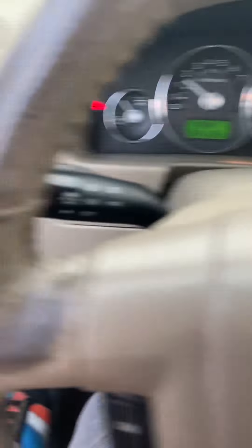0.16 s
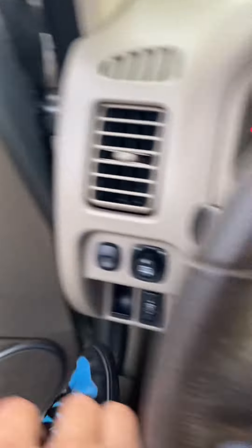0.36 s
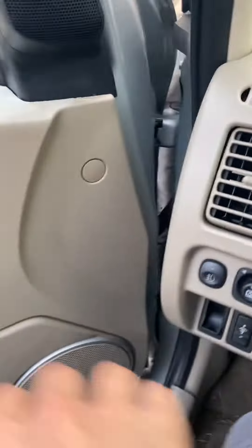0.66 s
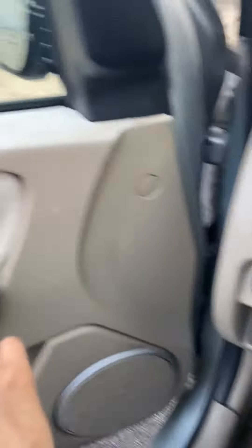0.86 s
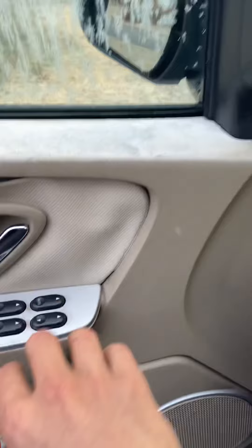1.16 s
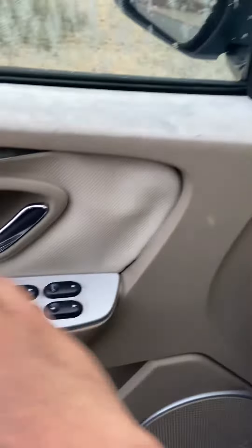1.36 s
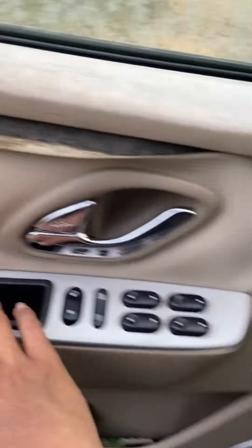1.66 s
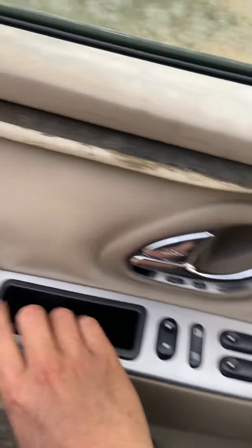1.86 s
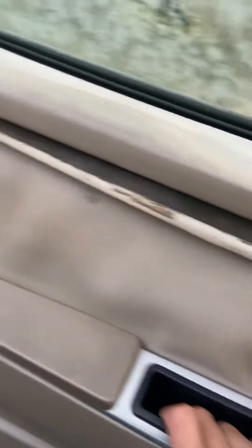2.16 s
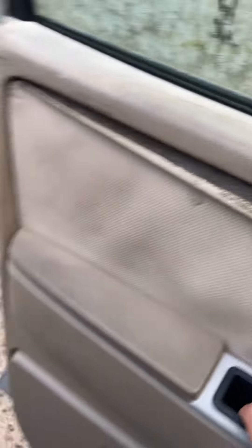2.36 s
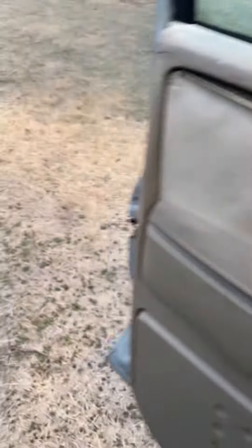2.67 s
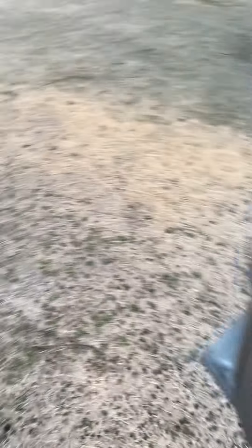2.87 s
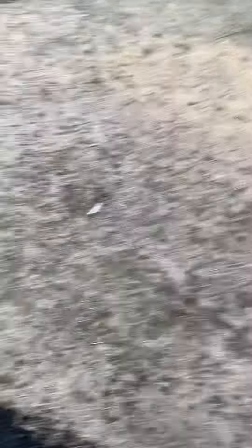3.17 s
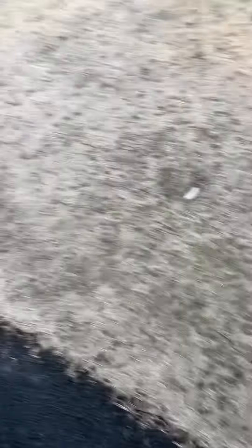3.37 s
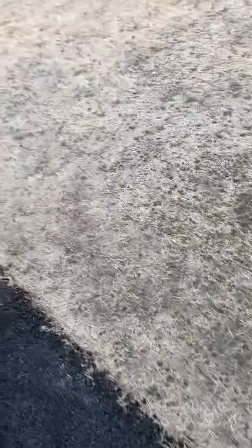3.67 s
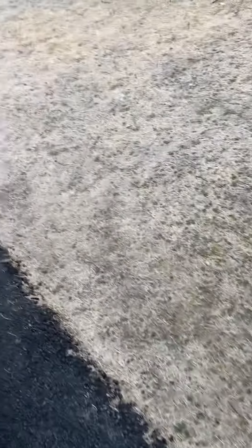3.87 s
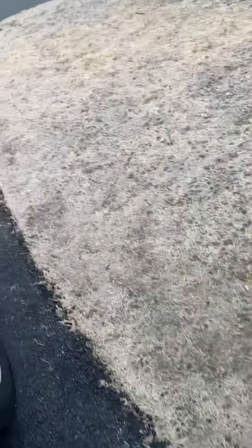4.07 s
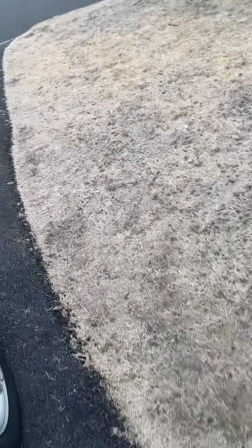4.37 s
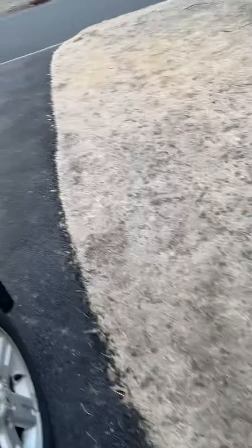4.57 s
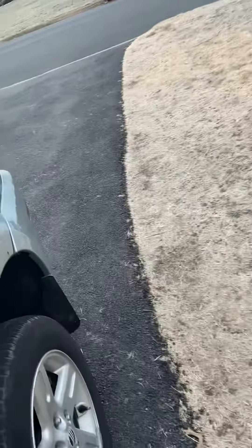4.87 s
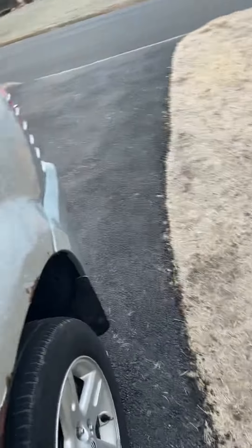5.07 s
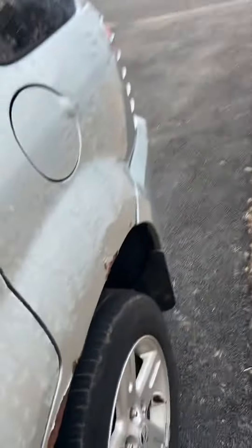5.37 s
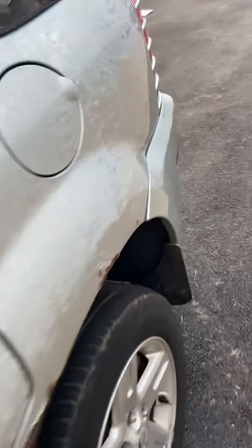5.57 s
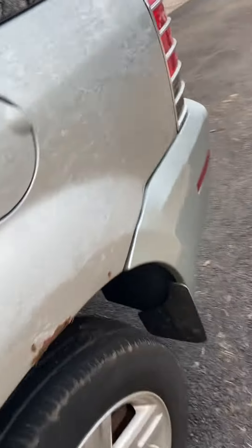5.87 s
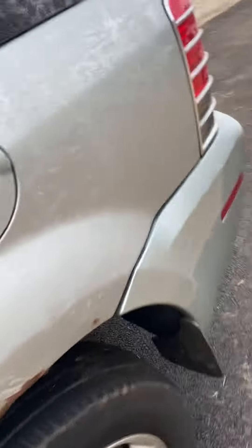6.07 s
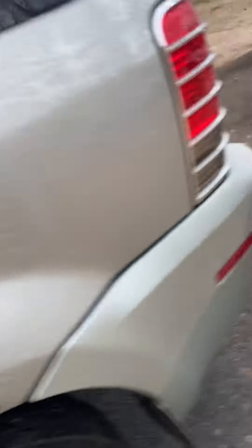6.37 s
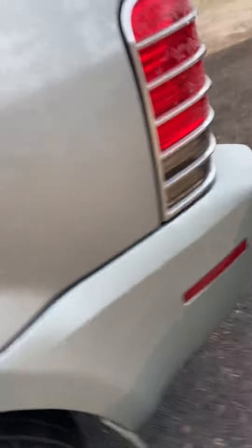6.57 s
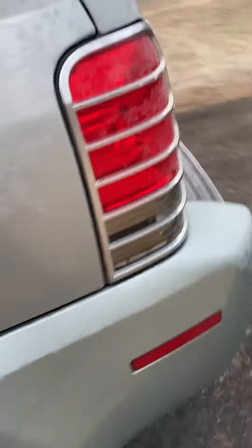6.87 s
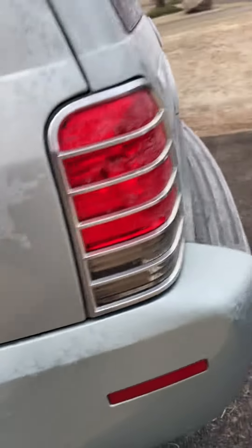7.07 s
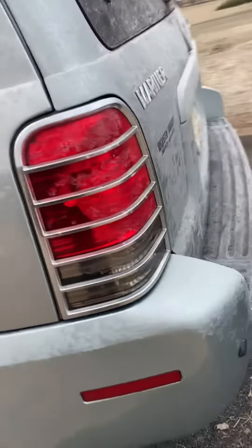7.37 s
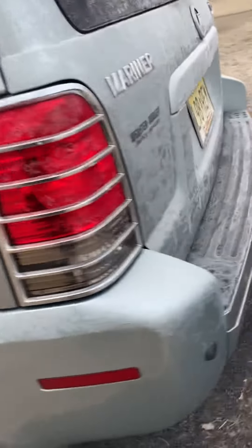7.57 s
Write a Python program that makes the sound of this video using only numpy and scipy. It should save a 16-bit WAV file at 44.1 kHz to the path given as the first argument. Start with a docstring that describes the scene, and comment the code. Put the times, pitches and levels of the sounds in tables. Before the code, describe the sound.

Low droning car idle with whine and hiss, knocks on plastic trim and rustling cloth, then one heavy door slam as the engine runs on.

```python
"""A cold four-cylinder car engine runs at fast idle on a driveway, heard from a hand-held microphone.
Exhaust tones, a pulley hum, an alternator whine and coloured noises share one slightly wandering crank.
Someone climbs out of the driver's seat, bumping and tapping the trim, steps onto dry grass and walks to the rear:
impulses strike ringing modes and bursts of noise, and cloth rubs. The door swings shut: the latch rattles
home through small metal modes, then the panel and cabin boom through large ones."""
import sys
import numpy as np
from scipy import signal
from scipy.fft import rfft, irfft, next_fast_len
from scipy.io import wavfile
from scipy.ndimage import map_coordinates

SR = 44100
rng = np.random.default_rng(int(sys.argv[2]) if len(sys.argv) > 2 else 0)


def inscribe(sig):
    """Save sig as 16-bit PCM at rate SR to the path in sys.argv[1].

    A 1-D sig is mono; a 2-D sig holds one channel per row.
    Samples are clipped to [-1, 1] before scaling.
    """
    pcm = np.round(np.clip(np.atleast_2d(sig).T, -1, 1) * 32767)
    wavfile.write(sys.argv[1], SR, pcm.astype(np.int16))


N = 340011
TIME = np.arange(N) / SR

# Pitches: mean firing rate, pulley, drone beside the car, alternator
FIRING_HZ, PULLEY_HZ, DRONE_HZ, WHINE_HZ = 53.35, 111.0, 341.0, 1146.2
# The four cylinders differ in strength and timing, and no two cold strokes burn alike
UNEVEN_DB, LOPE_RAD, STROKE_SCATTER_DB = 0.5, 0.065, 0.5
# Levels before any swell or exposure change
DRONE_DB, OFFBEAT_DB, WHINE_DB = -57.5, -54.5, -56.5
RUMBLE_DB, SILENCER_DB, FAN_DB, CLATTER_DB, TAILPIPE_DB = -43.5, -44, -49.5, -50, -53.5
# Share of the exposure's swing in dB that each bay sound follows
FAN_FOLLOWS, CLATTER_FOLLOWS, WHINE_FOLLOWS = 0.42, 1.1, 0.5
FAN_FADE_DB_PER_S = 1  # the fan falls behind on the walk
# The rear corner is rounded: time, ease of the turn, and how the bay's noises change there
CORNER_S, CORNER_TURN_S, REAR_FAN_DB, REAR_CLATTER_DB = 6.3, 0.42, 6.5, -3.5
TAILPIPE_OPEN_S, TAILPIPE_TURN_S = 6.28, 0.12  # the bumper stops shading the rush
RUB_ATTACK_S, RUB_RELEASE_DB_PER_S = 0.012, 149
HARD_CONTACT_HZ = 900  # contacts softer than this stir the small modes less

# Exhaust tones: (multiple of the firing rate, level [dB])
EXHAUST_TONES = [(1, -44), (2, -47), (3, -40), (4, -41.5), (5, -42), (6, -68), (7, -61.5), (8, -63.5),
                 (9, -63.5), (11, -74.5)]
# Walk spots where reflections swell or cancel an exhaust tone:
# (multiple, time [s], change [dB], half-width [s])
EXHAUST_SPOTS = [(1, 3.8, 11, 1.95), (1, 7.27, -13, 0.36), (2, 2.2, -9, 0.28), (2, 8.3, -19, 1.4),
                 (3, 0.66, -8, 0.82), (3, 3.1, 1, 0.25), (3, 5.05, -24, 0.43), (4, 0.1, -20, 0.23),
                 (4, 1.97, 7.5, 0.61), (4, 6.04, 4, 0.32), (4, 7.3, 1, 0.36), (5, 2.67, -12, 1.18),
                 (5, 6.42, -8.5, 0.14), (5, 7.63, 1.5, 0.41), (6, 7, 10, .4), (7, 4.1, 7, 0.78),
                 (8, 7.8, 4, 0.4), (9, 7.9, 1, 0.28)]
# Swells of the tone between exhaust multiples: (time [s], change [dB], half-width [s])
OFFBEAT_SWELLS = [(2.1, 8, 0.51), (6.8, 9.5, 0.45)]
# Belt-driven pulley hum, each tone loudest at one spot of the walk:
# (multiple of the pulley rate, level [dB], time of the spot [s], swell there [dB])
PULLEY_TONES = [(4, -65, 7.3, 8), (5, -65, 7, 2), (6, -63.5, 4.2, 6.5), (7, -64, 3.85, 9), (8, -68, 1.3, 9),
                (11, -71, 1.7, 6), (20, -67, 4.4, 4)]
# Alternator whine: (multiple of the whine pitch, level within the whine [dB])
WHINE_TONES = [(1, -4), (2, -1), (3, -11), (4, -13.5)]
# Swells and dips of the whine's partials: (multiple, time [s], change [dB], half-width [s])
WHINE_SWELLS = [(1, 2.3, 4, .2), (1, 2.7, -12, .12), (1, 3.7, -6, .2), (1, 5.05, -12, .25),
                (1, 6.75, -9, .13), (1, 7.6, 6, .25), (2, 0.2, -8, .35), (2, 1.35, 4.5, .12),
                (2, 1.9, -5, .12), (2, 2.35, 3, .15), (2, 2.85, -4, .15), (2, 3.58, 5.5, .2),
                (2, 4.1, -4, .06), (2, 4.3, 2, .1), (2, 4.9, -8, .3), (2, 7.35, 4, .22), (3, 4.7, -5, .7),
                (3, 6.5, 2.5, .2), (3, 7.25, 4.5, .22), (4, 7.1, 6, .2)]
# Low exhaust rumble, colour: (frequency [Hz], relative density [dB])
RUMBLE_COLOUR = [(20, -29), (32, -22), (45, -10), (65, 1.5), (105, 1.5), (135, -3.5), (175, -8),
                 (300, -36.5), (1000, -74.5)]
# Silencer gas noise, colour: (frequency [Hz], relative density [dB])
SILENCER_COLOUR = [(120, -10.5), (178, -5), (235, 2.5), (280, -2), (320, -7.5), (450, -25.5), (900, -81)]
# Fan noise, colour: (frequency [Hz], relative density [dB])
FAN_COLOUR = [(180, -60.5), (360, 3), (470, -2.5), (620, 2), (760, -5), (1000, -5.5), (1170, -6.5),
              (1500, -6.5), (2000, -43), (4000, -81)]
# Valve clatter, colour: (frequency [Hz], relative density [dB])
CLATTER_COLOUR = [(1000, -42), (1680, -10.5), (1900, -1), (2250, -2.5), (2450, -7), (2800, -11),
                  (4000, -103)]
# Treble hiss of the belt, colour: (frequency [Hz], relative density [dB])
HISS_COLOUR = [(1500, -14), (2700, 2), (3400, 2), (4000, -2), (5200, 0.5), (5800, -0.5), (6400, -6.5),
               (8200, -10), (10500, -13.5), (14000, -17), (15200, -27.5), (18000, -45)]
# Tailpipe rush, colour: (frequency [Hz], relative density [dB])
TAILPIPE_COLOUR = [(300, -41), (520, 10.5), (720, 3), (950, -34), (1700, -13), (2550, 1), (2900, -6.5),
                   (3250, 0.5), (3650, -9), (4000, -11), (6000, -34), (12000, -34)]
# Rubbing cloth, colour: (frequency [Hz], relative density [dB])
CLOTH_COLOUR = [(150, -29), (450, 7), (1100, -11.5), (1800, -2), (3000, -29), (5500, -11.5), (10500, -12.5),
                (15500, -21), (18000, -30)]
# How diffuse the steady noises are: (frequency [Hz], side minus mid [dB])
NOISE_WIDTH = [(100, -79), (250, -23), (500, -6.5), (1100, -5), (1900, -18), (3000, -6.5), (4500, -6.5),
               (7000, -85), (14000, -44.5)]
# How openly the engine bay is heard, past the open door and along the car;
# only the swing about the mean counts: (time [s], level [dB])
BAY_EXPOSURE = [(0.95, -53.5), (2.34, -50.5), (2.53, -50.5), (3.7, -51.5), (4.64, -51), (5.58, -51.5),
                (5.98, -47.5), (6.45, -50), (6.97, -50.5), (7.71, -49)]
# Hiss along the walk: (time [s], level [dB])
HISS_WALK = [(0, -56.5), (0.3, -54), (1.1, -54.5), (2.3, -53), (3.25, -51.5), (3.9, -52.5), (5.4, -54),
             (6.35, -52), (6.8, -51.5), (7.15, -49.5), (7.7, -51.5)]
# The door meets its seal, beds in and rocks on its latch:
# (time [s], impulse level [dB], contact softness as low-pass [Hz])
SLAM_CONTACTS = [(5.6496, -16.5, 750), (5.6556, -6, 600), (5.6586, -11.5, 930), (5.68, -9, 247),
                 (5.7078, -7, 104), (5.713, -9.5, 69.5), (5.716, -26, 550)]
# Door panel and cabin resonances: (frequency [Hz], level [dB], t60 [s])
PANEL_MODES = [(52.5, 2.3, 0.11), (61.7, -4.5, 0.38), (80.3, -8.5, 0.47), (108, 7, 0.06),
               (131, -18.5, 0.33), (205, -31, 0.54), (247, -1, 0.073), (271, -3, 0.14), (311, 2.1, 0.047),
               (440, -21, 0.17), (506, 2.5, 0.063), (560, -24, 0.17), (628, -21, 0.18), (715, -20, 0.21),
               (1016, -26, 0.12), (1110, -24, 0.18), (1400, -22, 0.095), (1440, -20, 0.093)]
# Latch pawl and lock rods: (time [s], impulse level [dB], impulse level of the bright metal ping [dB])
LATCH_CLICKS = [(5.6256, -12, -17), (5.6285, -10.5, -13), (5.6325, -18, -18), (5.637, -22, -30),
                (5.6445, -15, -8), (5.6487, -12.5, -11), (5.656, -20, -22), (5.664, -22, -26),
                (5.6755, -24, -8), (5.686, -24.5, -19), (5.706, -35, -25)]
# Latch resonances: (frequency [Hz], level [dB], t60 [s])
METAL_MODES = [(503, -10.5, 0.11), (743, -13, 0.056), (1050, -16.5, 0.029), (1470, -12.5, 0.041),
               (1560, -11.5, 0.056), (1900, -21, 0.045), (2300, -21, .04), (3420, -26, 0.036),
               (4650, -29, 0.03), (5230, -26, 0.033), (5500, -32, .035)]
# Feet and knees bump the sill and trim:
# (time [s], impulse level [dB], contact softness as low-pass [Hz])
BODY_BUMPS = [(0.2462, -18, 1300), (0.251, -31, 400), (0.435, -24, 3000), (0.442, -8.5, 251),
              (0.4613, -12, 292), (0.4782, -19, 788), (0.5053, -18, 747), (0.542, -20.5, 700),
              (0.576, -18.5, 800), (0.593, -10.5, 362), (0.603, -16.5, 700), (0.6287, -13.5, 114),
              (0.648, -20, 106), (0.67, -12, 70), (1.724, -24, 250)]
# Floor pan resonances: (frequency [Hz], level [dB], t60 [s])
FLOOR_PAN_MODES = [(53.6, -28, 0.45), (93, -18, 0.62), (98, -8.5, 0.036), (170.3, -4, 0.11),
                   (197, -33, 0.55), (220, -9.5, 0.04), (289.4, -17, 0.23), (344, -23.5, 0.22),
                   (508, -17, 0.09), (613, -22, 0.072), (1020, -17, 0.026), (1230, -26, 0.057)]
# Taps on plastic trim and crackles underfoot: (time [s], ring level [dB], ring centre [Hz], ring t60 [s],
# upper mode level [dB], upper mode [Hz], crack impulse level [dB])
TRIM_TAPS = [(0.171, -38, 7100, .01, -62, 10500, -42), (0.4355, -28, 1100, 0.037, -43, 2600, -29.5),
             (0.442, -35, 2480, 0.013, -48, 2900, -48), (0.472, -35, 1020, 0.03, -44, 2500, -43),
             (0.487, -36, 1190, 0.018, -35, 1900, -43), (0.5181, -34, 1200, .025, -43, 2300, -50),
             (0.547, -31, 754, .025, -45, 1300, -49), (0.556, -32, 1020, .025, -37, 2650, -52),
             (0.572, -34, 1250, .016, -37, 2000, -52), (0.5877, -29, 1000, 0.022, -38, 1600, -49),
             (0.599, -38, 1230, 0.026, -32, 2050, -51), (0.6443, -37, 800, 0.029, -47, 1900, -53),
             (1.7192, -21, 1030, 0.021, -30.5, 3560, -39), (1.738, -37, 1100, 0.05, -50, 1300, -60),
             (2.0295, -21, 856, 0.014, -34, 1600, -27.5), (2.172, -25, 667, 0.022, -30, 1440, -57),
             (2.180, -33, 560, 0.05, -40, 1350, -59), (2.5465, -30, 1040, 0.015, -35, 2400, -32),
             (3.402, -35, 2860, 0.012, -38, 4000, -49), (3.436, -25, 3630, 0.0046, -40, 5240, -40),
             (3.44, -40, 8700, .008, -36, 4000, -55)]
# Shoes scrape over the sill: (start [s], length [s], level [dB], centre [Hz])
SHOE_SCRAPES = [(0.39, 0.032, -51, 8000), (0.525, 0.045, -54, 2400), (0.52, 0.052, -49, 4500),
                (0.5, 0.095, -44, 1300), (0.53, 0.08, -35, 350)]
# Clothes slide over the seat and along the door: (start [s], length [s], level [dB])
CLOTH_RUBS = [(0.03, 0.27, -56.5), (0.429, 0.16, -44.5), (1.822, 0.79, -57)]
# Stereo phase by frequency: (frequency [Hz], left leads by [rad])
STEREO_PHASE = [(50, .02), (200, -.08), (700, -.4), (1200, -.4), (2700, .5), (4400, .55), (5200, .15),
                (6800, 3), (8100, 3.25), (9700, 6.2), (11500, 6.6), (12700, 9.3), (14500, 9.5),
                (15500, 12.4)]
# Stereo balance by frequency: (frequency [Hz], left minus right [dB])
STEREO_BALANCE = [(50, .1), (125, .2), (200, .7), (330, 2), (700, -.3), (1300, 0), (2400, -1), (8000, 0)]


def from_db(db):
    """Decibels to gain."""
    return np.exp(np.asarray(db) * (np.log(10) / 20))


def rms_one(x):
    """Scale to rms 1."""
    return x / np.sqrt(np.mean(x ** 2) + 1e-20)


def at_hz(points, hz):
    """Read a table on a log-frequency axis."""
    f, value = np.transpose(points)
    return np.interp(np.log(hz + 1), np.log(f), value)


def at_time(points):
    """Draw a table as straight lines over the whole scene."""
    return np.interp(TIME, *np.transpose(points))


def drift(rate):
    """Slow chance with spread 1: smoothed noise, computed every 100 samples; rate in Hz."""
    r = np.exp(-200 * np.pi * rate / SR)
    raw = rng.standard_normal(N // 100 + 2002)
    slow = signal.lfilter([1], [1, -2 * r, r * r], raw)[2000:]
    return np.interp(np.arange(N) / 100, np.arange(len(slow)), rms_one(slow))


def band(x, hz, kind, order=2):
    """Causal low-, high- or band-pass."""
    sos = signal.butter(order, np.clip(hz, 10, .45 * SR), kind, fs=SR, output="sos")
    return signal.sosfilt(sos, x + 1e-18)


def swell(s, db, width_s):
    """A smooth rise or dip in dB as the microphone passes a spot."""
    return db * np.exp(-.5 * ((TIME - s) / width_s) ** 2)


def swells_of(multiple, spots):
    """Sum the swells in dB that belong to one partial."""
    return sum(swell(*spot) for m, *spot in spots if m == multiple)


def add(out, s, sound):
    """Mix a short sound in at a given time."""
    start = int(s * SR)
    out[:, start:start + sound.shape[-1]] += sound[..., :N - start]


def noise(colour, repeating=0.):
    """Coloured stereo noise, rms 1; a share of its mid power repeats every mean engine cycle."""
    size = next_fast_len(N)
    hz = np.arange(size // 2 + 1) * SR / size
    cycle = np.resize(rng.standard_normal(round(4 * SR / FIRING_HZ)), size)
    share = np.clip(repeating, 0, .9)
    mid, side = rng.standard_normal((2, size))
    mid = np.sqrt(1 - share) * mid + np.sqrt(share) * cycle
    pair = rfft(mid) + from_db(at_hz(NOISE_WIDTH, hz)) * rfft(side) * [[1], [-1]]
    return rms_one(irfft(pair * from_db(at_hz(colour, hz)), size)[:, :N])


def click(s, db):
    """One impulse."""
    out = np.zeros(N)
    out[int(np.clip(s * SR, 0, N - 1))] = from_db(db)
    return out


def ring(force, hz, t60):
    """A unit click starts a decaying sine of initial height 1."""
    r, w = from_db(-60 / (t60 * SR)), 2 * np.pi * hz / SR
    return signal.lfilter([0, np.sin(w)], [1, -2 * r * np.cos(w), r * r], force + 1e-18)


def body(force, modes):
    """Parallel modes with alternating signs."""
    return sum((-1) ** k * from_db(db) * ring(force, hz, t60) for k, (hz, db, t60) in enumerate(modes))


def rattle(force, low_hz, high_hz, t60, width):
    """Countless small modes: a band of stereo noise that dies away after each blow."""
    envelope = signal.lfilter([1], [1, -from_db(-60 / (t60 * SR))], force + 1e-18)
    mid, side = rms_one(band(rng.standard_normal((2, len(force))), [low_hz, high_hz], "band"))
    return envelope * (mid + width * side * np.array([[1], [-1]]))


def hard_part(contacts):
    """The share of each contact that is sharp enough to set small parts rattling."""
    return sum(click(s, db) * min(hz / HARD_CONTACT_HZ, 1) for s, db, hz in contacts)


def scrapes(slips_per_s=900, slip_t60=0.0091):
    """A sole drags over the trim: a quick run of tiny slips that swells and stops."""
    out = np.zeros((2, N))
    for s, length, db, hz in SHOE_SCRAPES:
        stroke = np.hanning(int(length * SR))
        slips = (rng.random(len(stroke)) < slips_per_s / SR) * rng.uniform(.3, 1, len(stroke))
        grain = rattle(slips, low_hz=hz * 0.52, high_hz=hz * 1.13, t60=slip_t60, width=0.074)
        add(out, s, from_db(db) * stroke * rms_one(grain))
    return out


def taps(upper_t60=0.0081, split=0.051, twin_db=-4.5):
    """Each tap is a short crack, two close modes that beat and round off the knock, and a brief upper mode."""
    out, hit = np.zeros((2, N)), signal.unit_impulse(SR // 10)
    for s, db, hz, t60, upper_db, upper_hz, _ in TRIM_TAPS:
        panel = rattle(hit, low_hz=hz * .5, high_hz=hz * 1.25, t60=2.6 * t60, width=0.21)
        pair = ring(hit, hz * (1 - split), t60) - from_db(twin_db) * ring(hit, hz * (1 + split), t60)
        upper = from_db(upper_db) * ring(hit, upper_hz, upper_t60)
        add(out, s, from_db(db) * (pair + from_db(-11.5) * panel) - upper)
    cracks = sum(click(s, crack_db) for s, *_, crack_db in TRIM_TAPS)
    clack = from_db(-12.0) * rattle(cracks, low_hz=550, high_hz=2400, t60=0.037, width=0.3)
    snap = from_db(-17.0) * rattle(cracks, low_hz=2440, high_hz=4900, t60=0.028, width=1.0)
    crisp = from_db(-3.0) * rattle(cracks, low_hz=4930, high_hz=14000, t60=0.011, width=0.12)
    return out + clack + snap + crisp


def rub(start, length, db):
    """A slide builds up, holds and dies away."""
    attack = np.clip((TIME - start) / RUB_ATTACK_S, 0, 1)
    return attack * from_db(db - RUB_RELEASE_DB_PER_S * np.maximum(TIME - start - length, 0))


def rubbing_cloth(snags_per_s=170):
    """Cloth slides as flickering noise, and its random snags crackle."""
    slide = sum(rub(*row) for row in CLOTH_RUBS)
    cloth = from_db(-1.5) * slide * noise(CLOTH_COLOUR) * from_db(3.3 * drift(70))
    snags = slide * (rng.random(N) < snags_per_s / SR) * rng.exponential(0.79, N).clip(0, 3.5)
    crackle = from_db(-4.0) * rattle(snags, low_hz=447, high_hz=2490, t60=0.018, width=0.091)
    bright = from_db(-18.0) * rattle(snags, low_hz=2000, high_hz=8000, t60=0.0033, width=0.1)
    return cloth + crackle + bright


def climbing_out():
    """Dull bumps ring the floor pan and set the trim chattering, with cloth rubbing alongside."""
    force = sum(band(click(s, db), hz, "low", order=1) for s, db, hz in BODY_BUMPS)
    trim = from_db(-29) * rattle(hard_part(BODY_BUMPS), low_hz=300, high_hz=1510, t60=0.04, width=0.23)
    return body(force, FLOOR_PAN_MODES) + trim + rubbing_cloth()


def latch():
    """The pawl rides over its striker: clicks stir metal modes, a rattle and a bright ping."""
    pawl = sum(click(s, db) for s, db, _ in LATCH_CLICKS)
    ping = sum(click(s, db) for s, _, db in LATCH_CLICKS)
    low = from_db(-12.5) * rattle(pawl, low_hz=700, high_hz=2220, t60=0.03, width=.4)
    high = from_db(-23.5) * rattle(pawl, low_hz=3900, high_hz=6000, t60=0.059, width=0.11)
    bright = from_db(-28.0) * rattle(ping, low_hz=9500, high_hz=12900, t60=0.042, width=0.21)
    return body(pawl, METAL_MODES) + low + high + bright


def door():
    """The latch rattles, then the door hits the seal: soft blows boom the body and shake its shell."""
    force = sum(band(click(s, db), hz, "low") for s, db, hz in SLAM_CONTACTS)
    jolt = hard_part(SLAM_CONTACTS)
    shell = from_db(-16.0) * rattle(jolt, low_hz=220, high_hz=704, t60=0.12, width=0.73)
    shell = shell + from_db(-32.0) * rattle(jolt, low_hz=800, high_hz=2520, t60=0.27, width=0.21)
    outdoor_tail = from_db(-36.5) * rattle(force, low_hz=54.7, high_hz=348, t60=0.69, width=0.091)
    return body(force, PANEL_MODES) + latch() + shell + outdoor_tail


def off_the_ground(x, lag_s=0.002366, strength=0.3):
    """A bounce off the ground colours the sound; the extra path drifts slowly."""
    late = np.arange(N) - lag_s * SR * (1 + 0.05 * drift(0.36))
    bounce = np.array([map_coordinates(channel, [late], order=3) for channel in x])
    return (x + strength * bounce) / np.hypot(1, strength)


def rough_tone(cycles, waver_db=2.5, rough=0.35):
    """A machine tone that wavers slowly and trembles faster in level and phase."""
    phase = 2 * np.pi * (cycles + rng.random()) + rough * drift(15)
    return from_db(waver_db * drift(0.58)) * (1 + rough * drift(8.5)) * np.cos(phase)


def machine_hum(clock, exposure):
    """Drone, pulley tones and alternator whine turn in step with the crank."""
    tones = from_db(DRONE_DB + swell(3.0, 6.5, width_s=0.65)) * rough_tone(DRONE_HZ * clock)
    for multiple, db, spot_s, swell_db in PULLEY_TONES:
        gain = from_db(db + swell(spot_s, swell_db, width_s=0.65))
        tones = tones + gain * rough_tone(multiple * PULLEY_HZ * clock)
    whine_db = WHINE_DB + WHINE_FOLLOWS * exposure
    for multiple, db in WHINE_TONES:
        gain = from_db(db + whine_db + swells_of(multiple, WHINE_SWELLS))
        tones = tones + gain * rough_tone(multiple * WHINE_HZ * clock, waver_db=1.8, rough=0.33)
    return tones


def exhaust(firing, flutter_db=0.39):
    """Firing harmonics lope over each engine cycle; the open pipe inverts those above the first."""
    uneven = from_db(UNEVEN_DB * np.cos(firing / 4) + STROKE_SCATTER_DB * drift(25))
    loping = firing - LOPE_RAD * np.sin(firing / 4)
    tones = 0
    for multiple, db in EXHAUST_TONES:
        flutter = flutter_db * (drift(4.7) + drift(22))
        gain = from_db(db + swells_of(multiple, EXHAUST_SPOTS) + flutter)
        tones = tones + (1 if multiple == 1 else -uneven) * gain * np.cos(multiple * loping)
    # the uneven cylinders also sound one engine-cycle rate below the fourth multiple
    offbeat_db = OFFBEAT_DB + sum(swell(*spot) for spot in OFFBEAT_SWELLS)
    return tones + from_db(offbeat_db) * np.cos(4 * firing - firing / 4)


def gas_noise(firing, throb=0.54):
    """Steady low rumble, strongest over the door sill, and silencer noise that puffs with each firing."""
    rumble = from_db(RUMBLE_DB + swell(2.1, 3, width_s=0.33)) * noise(RUMBLE_COLOUR)
    puffs = rms_one(1 + throb * np.cos(firing))
    return rumble + from_db(SILENCER_DB) * noise(SILENCER_COLOUR, repeating=0.12) * puffs


def bay_noise(firing, exposure, tick_depth=0.12):
    """Fan noise, valves ticking unevenly three times a crank turn, and a flickering belt hiss."""
    rear = .5 + .5 * np.tanh((TIME - CORNER_S) / (2 * CORNER_TURN_S))
    fan_db = FAN_DB + FAN_FOLLOWS * exposure - FAN_FADE_DB_PER_S * (TIME - TIME.mean())
    # the fan swells once clear of the door
    fan_db = fan_db + REAR_FAN_DB * rear + swell(3.9, 1.3, width_s=0.44)
    fan = from_db(fan_db + 1.0 * drift(34)) * noise(FAN_COLOUR, repeating=0.39)
    ticks = rms_one(np.exp(tick_depth * .5 * (np.cos(1.5 * firing) + drift(70))))
    clatter_gain = from_db(CLATTER_DB + CLATTER_FOLLOWS * exposure + REAR_CLATTER_DB * rear)
    clatter = clatter_gain * noise(CLATTER_COLOUR, repeating=0.18) * ticks
    belt = from_db(at_time(HISS_WALK) + 1.1 * drift(8.0)) * noise(HISS_COLOUR, repeating=0.25)
    return fan + clatter + belt


def tailpipe():
    """Rushing gas emerges past the bumper and swells as its jet points at the microphone."""
    unshaded = .5 + .5 * np.tanh((TIME - TAILPIPE_OPEN_S) / TAILPIPE_TURN_S)
    return from_db(TAILPIPE_DB + swell(6.83, 6.1, width_s=0.16)) * unshaded * noise(TAILPIPE_COLOUR)


def engine(wander=0.00078):
    """One slightly wandering crank drives the tones, puffs and ticks."""
    clock = np.cumsum(1 + wander * drift(1.54)) / SR
    firing = 2 * np.pi * FIRING_HZ * clock
    exposure = at_time(BAY_EXPOSURE)
    # at first the cabin shields the microphone from the bay
    exposure = exposure - exposure.mean() + swell(0, -6, width_s=0.11)
    tones = np.sqrt(2) * (exhaust(firing) + machine_hum(clock, exposure))  # cosine levels become rms
    return tones + gas_noise(firing) + off_the_ground(bay_noise(firing, exposure) + tailpipe())


def scene():
    """The engine runs throughout; everything else is within arm's reach, the door slightly left."""
    return scrapes() + taps() + climbing_out() + door() * from_db([[.25], [-.25]]) + engine()


def record(dry):
    """Left and right differ in phase and level; the deepest bass is lost, peaks are rounded and the top is cut."""
    size = next_fast_len(N + SR // 10)
    hz = np.arange(size // 2 + 1) * SR / size
    half = np.array([[.5], [-.5]])  # each channel takes half the difference
    stereo = from_db(half * at_hz(STEREO_BALANCE, hz)) * np.exp(1j * half * at_hz(STEREO_PHASE, hz))
    out = irfft(rfft(band(dry, 14.0, "high"), size) * stereo, size)[:, :N]
    out = .85 * out / (1 + np.abs(out / .85) ** 6) ** (1 / 6)
    return signal.sosfilt(signal.ellip(10, .2, 80, 15900, fs=SR, output="sos"), out)


dry = scene()
out = record(dry)
inscribe(out)
```